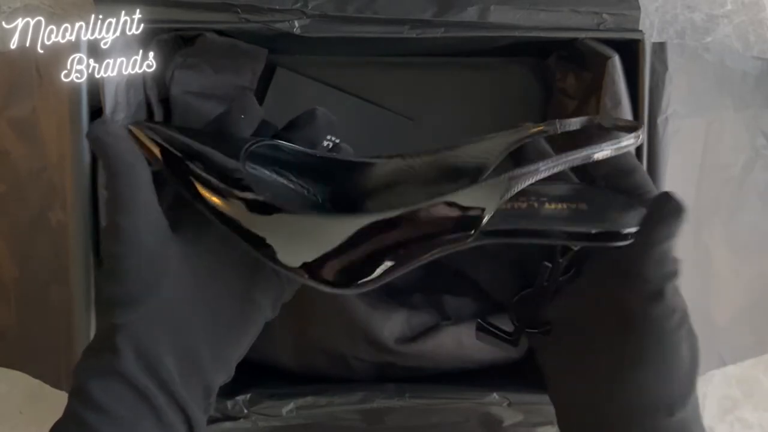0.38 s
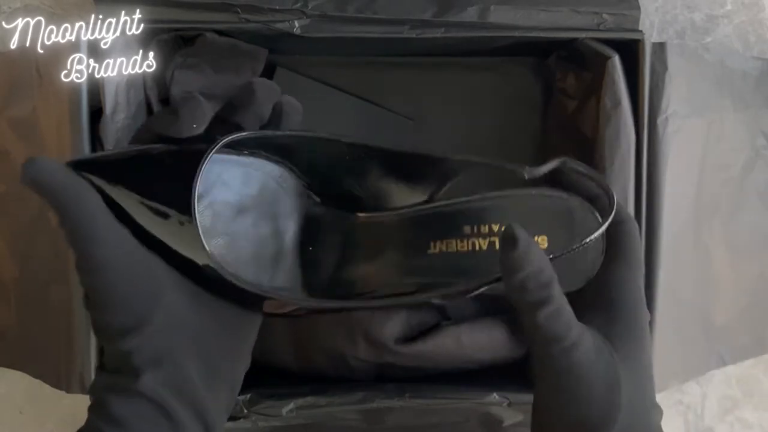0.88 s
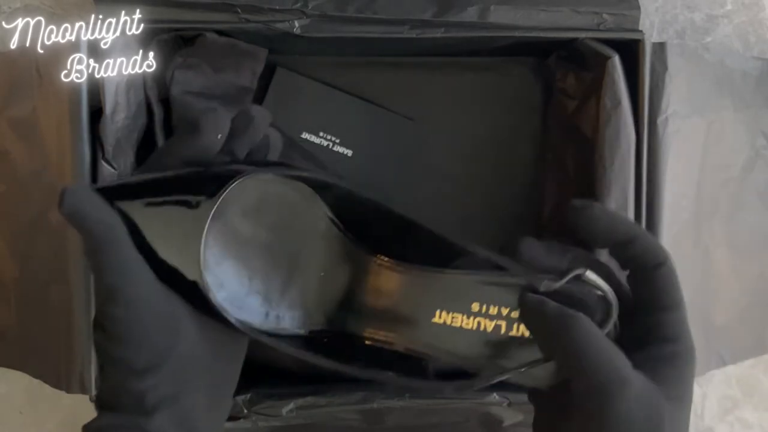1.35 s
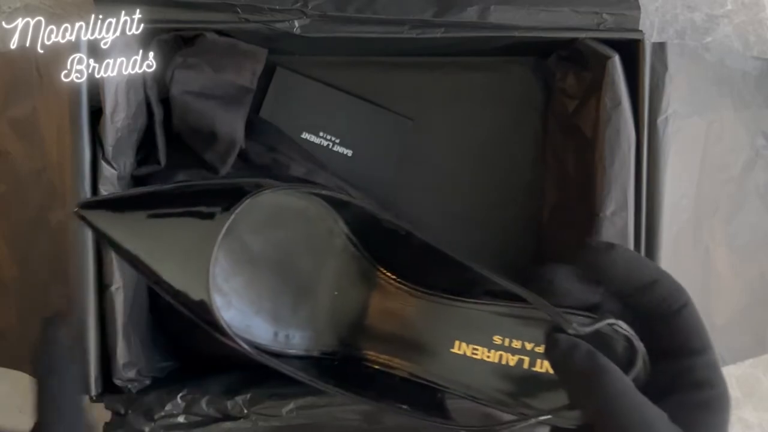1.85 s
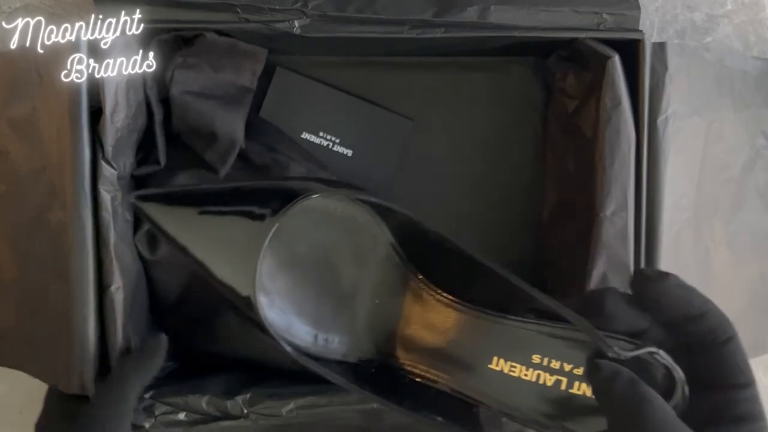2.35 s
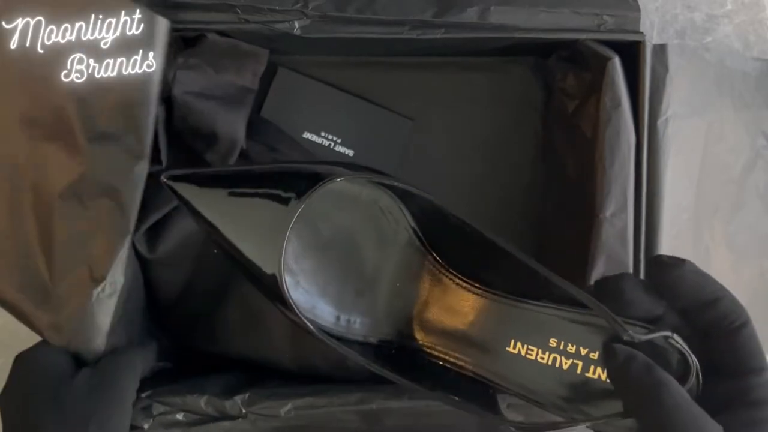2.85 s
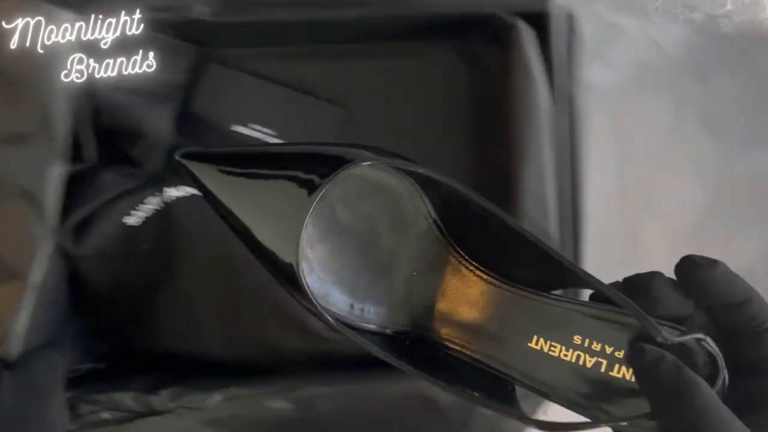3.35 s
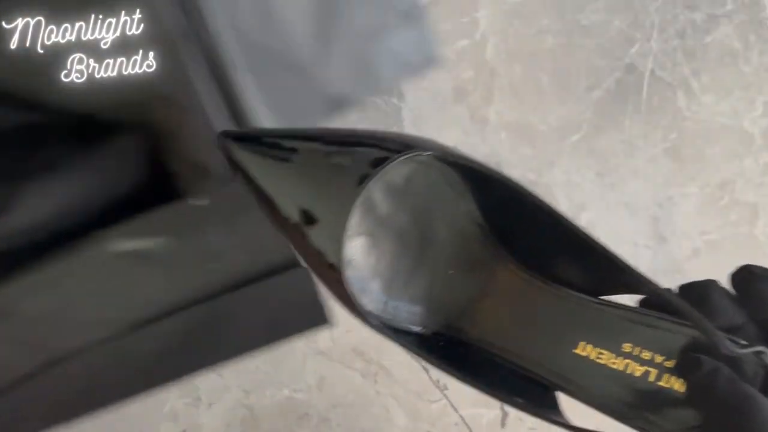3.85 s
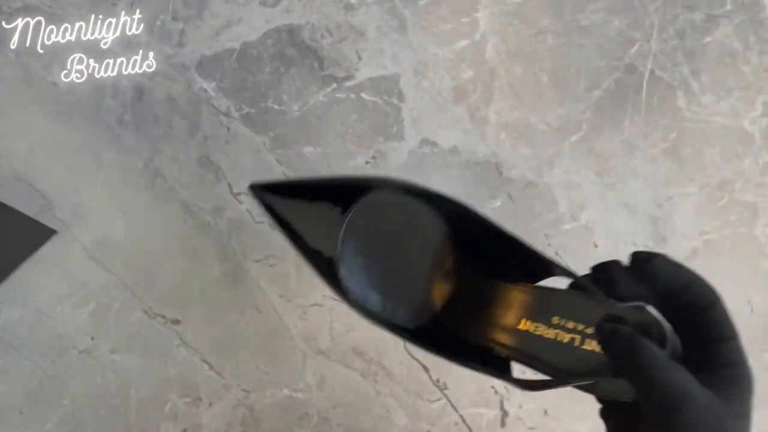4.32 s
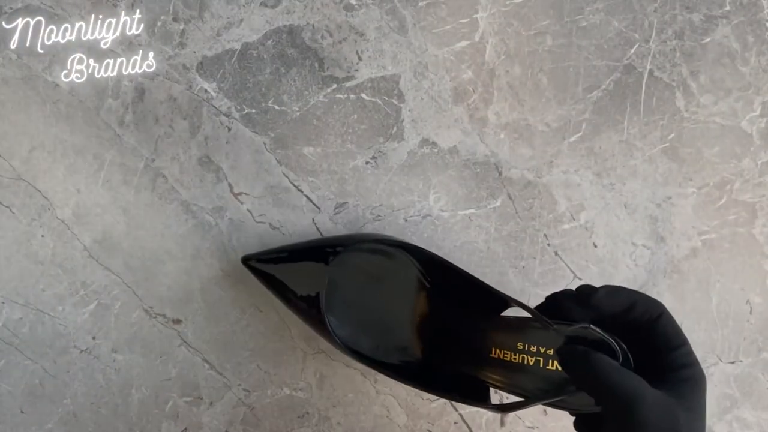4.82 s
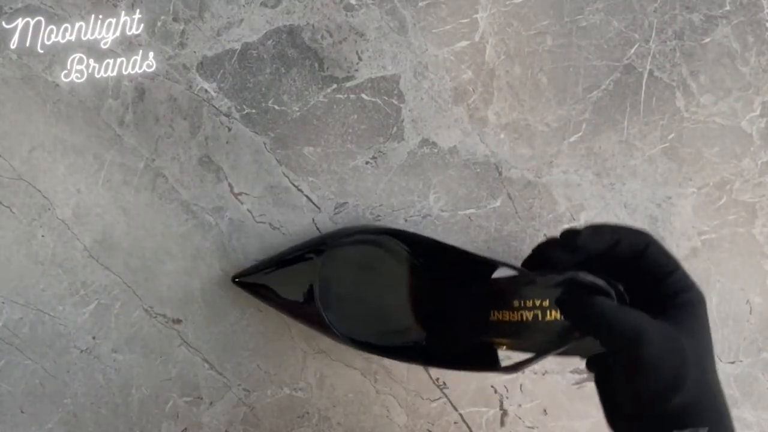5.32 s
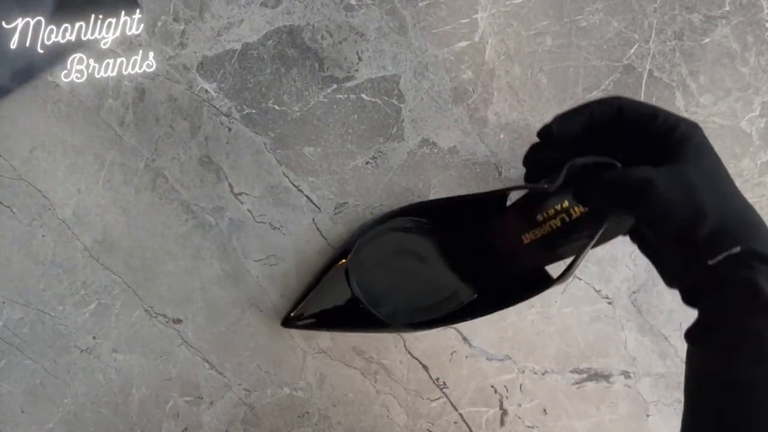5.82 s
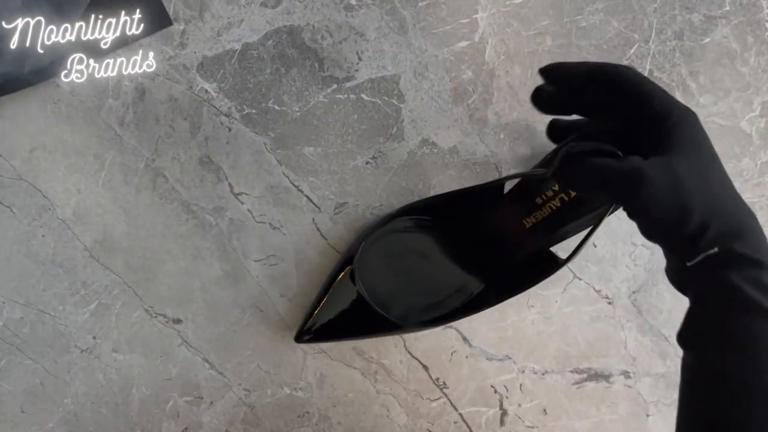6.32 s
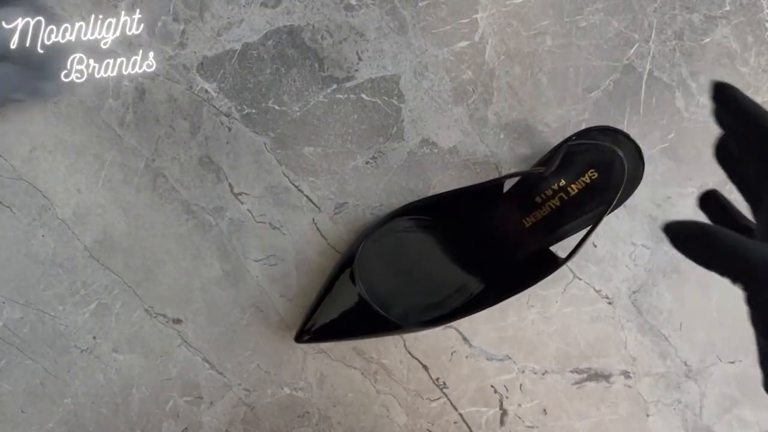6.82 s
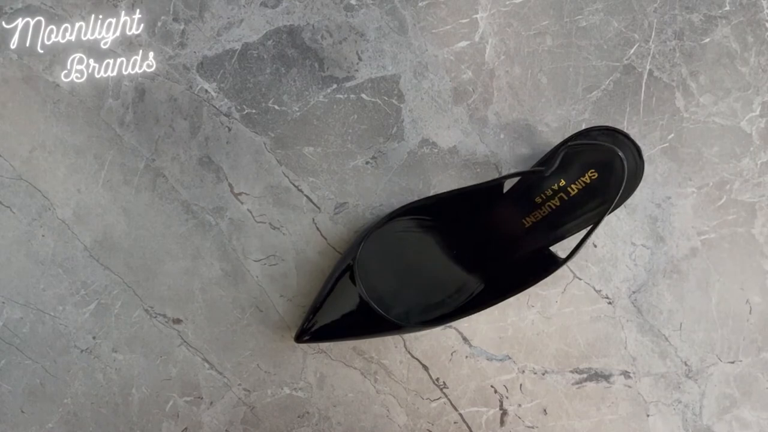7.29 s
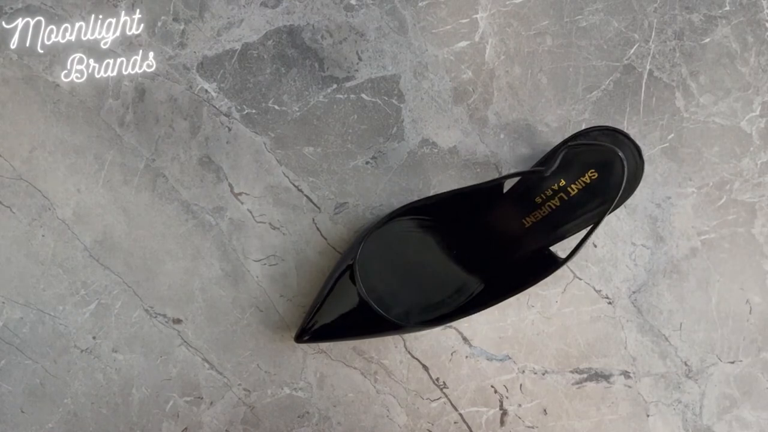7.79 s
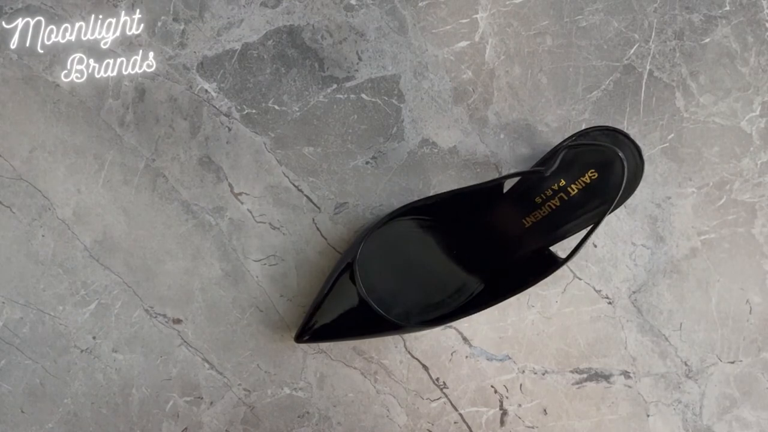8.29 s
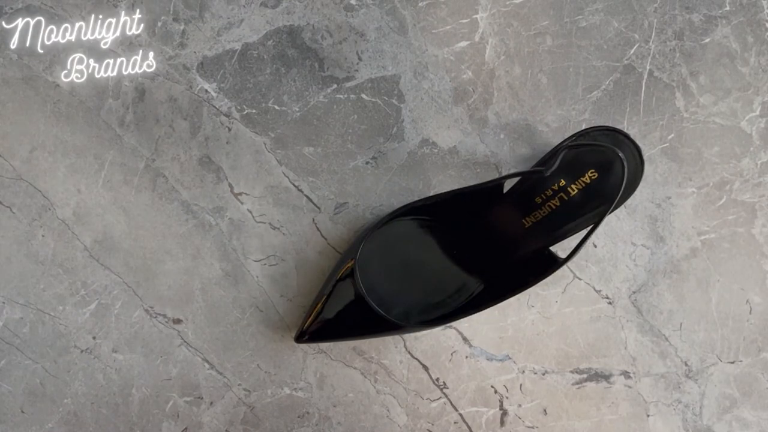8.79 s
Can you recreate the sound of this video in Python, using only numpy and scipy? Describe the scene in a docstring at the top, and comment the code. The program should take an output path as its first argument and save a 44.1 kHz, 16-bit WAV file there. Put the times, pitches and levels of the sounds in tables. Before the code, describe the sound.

Indoors, gloved hands handle a shoe almost silently over faint low room noise. Abruptly, crisp paper crinkles close by, with sharp individual creases. Stiff cardboard drags across a stone floor, ticking lightly at its edge, before one strong low thump and a quick hard heel click. Paper keeps rustling in irregular, quieter fits with short lulls, and a muffled box knock comes late. Close, dry stereo pickup.

```python
"""You hear soft glove strokes on a shoe, then busy tissue paper, a sliding box, thuds and taps, over low room noise.
Gloved hands turn the shoe over a cardboard box lined with tissue paper, drag the box aside over a stone floor
and go on handling the paper nearby. Gloves are smooth noise; paper is noise chopped into dense crackle, with
single loud creases on top; dragged cardboard adds a scrape and a hollow rumble. Box and heel ring when struck."""
import sys
import numpy as np
from scipy import signal
from scipy.fft import rfft, irfft
from scipy.io import wavfile
from scipy.ndimage import uniform_filter1d

SR = 44100
rng = np.random.default_rng(int(sys.argv[2]) if len(sys.argv) > 2 else 0)


def bounce(signal):
    """Save signal as a 16-bit WAV file at the path given by the first command-line argument."""
    frames = np.transpose(np.atleast_2d(signal))
    limited = np.clip(frames, -1, 1)
    pcm = np.round(limited * 32767).astype(np.int16)
    wavfile.write(sys.argv[1], SR, pcm)


def boost(x):
    """Linear amplitude factor 10**(x/20) for a level x in decibels (scalar or array-like)."""
    u = np.asarray(x, float) / 20
    return 10 ** u


N = 392931
T = np.arange(N) / SR  # time of every sample, s
HZ = np.arange(N // 2 + 1) * SR / N  # frequency of every spectrum line

# movements of the paper, with lulls between: start/s, length/s, rustle at start/dB, rustle at end/dB
PAPER_MOVES = [(2.014, .26, -52, -53.5), (2.348, 0.23, -54.5, -52.5), (2.595, 0.23, -46.5, -40.5),
               (2.884, 0.067, -39.5, -53), (2.976, 0.054, -57, -49.5), (3.08, 0.14, -59, -56),
               (3.186, 0.023, -55, -53.5), (3.221, 0.54, -45, -50), (3.846, .13, -59, -49.5),
               (3.988, 0.092, -46, -57), (4.145, 0.24, -54, -50), (4.428, 0.074, -54, -49.5),
               (4.518, 0.28, -46, -47.5), (4.834, 0.13, -58, -57), (4.934, 0.19, -52.5, -51.5),
               (5.122, 0.19, -45.5, -48), (5.341, 0.076, -46.5, -45), (5.456, 0.36, -64, -56),
               (5.804, 0.47, -50.5, -56.5), (6.121, 0.12, -51, -48.5), (6.278, 0.15, -58, -57),
               (6.545, 0.21, -58, -51.5), (6.803, 0.28, -53, -54.5), (7.23, 0.23, -68.5, -59.5),
               (7.598, 0.05, -58, -69), (7.67, 0.12, -65, -70), (7.823, .14, -62.5, -51),
               (7.966, .15, -63, -52.5), (8.137, 0.21, -50, -57.5), (8.437, 0.054, -53.5, -64.5),
               (8.596, 0.15, -54.5, -62), (8.851, 0.13, -59, -64)]
# tone colour of tissue paper: f/Hz, level/dB
TISSUE_COLOUR = [(500, -9), (900, 1), (1400, -1.5), (2300, 3), (3500, 2.67), (5500, 2.5), (8000, 4),
                 (10300, -1.5), (12200, 5.5), (15000, -1.5), (16000, -2)]
# tone colour of what differs between left and right: f/Hz, level/dB
SIDE_COLOUR = [(60, -64), (200, -20), (400, -9.5), (730, -5), (1200, -6.5), (1700, -25), (2500, -32),
               (4500, -20), (8000, -14.5), (11500, -12.5), (13200, -28)]


def unit(x):
    """Scale to an rms (average strength) of 1."""
    return x / np.sqrt(np.mean(x ** 2))


def colour(x, points):
    """Filter by a spectrum given as (Hz, dB) points."""
    hz, db = np.transpose(points)
    gain_db = np.interp(np.log(HZ + 1), np.log(hz), db)
    return irfft(rfft(x) * boost(gain_db), N)


def curves(table):
    """Draw each column of a table as a curve over all samples; the first column is time."""
    s, *columns = np.transpose(table)
    return [np.interp(T, s, c) for c in columns]


def noise():
    """Plain white noise as long as the scene."""
    return rng.standard_normal(N)


def walk(rate):
    """Smooth random wandering with an rms of 1; a higher rate wanders faster."""
    k = int(SR / rate)
    return unit(uniform_filter1d(uniform_filter1d(noise(), k), k))


def band(x, lo_hz, hi_hz):
    """Keep only the band between two frequencies."""
    return signal.sosfilt(signal.butter(2, [lo_hz, hi_hz], "bandpass", fs=SR, output="sos"), x)


def crackle(rate, scatter_db, length_ms):
    """Noise chopped into short bursts at random moments (rate per s); a few are much louder than the rest."""
    size = boost(scatter_db * np.minimum(rng.exponential(size=N), 4))
    starts = (rng.random(N) < rate / SR) * size
    fall = np.exp(-1000 / (length_ms * SR))
    # a quick filter rounds the start, a slow one makes the decay
    rounded = signal.lfilter([1], [1, -fall ** 5], starts)
    swell = signal.lfilter([1], [1, -fall], rounded)
    return unit(swell * noise())


def knocks(blows, modes, swell_ms):
    """A half-sine push of the contact time rings the modes of the struck body, which take a moment to build up."""
    push = np.zeros(N)
    for s, db, contact_ms in blows:
        k = max(int(contact_ms * SR / 1000), 4)
        start = int(s * SR)
        push[start:start + k] += boost(db) * np.sin(np.pi * np.arange(k) / k) / k
    t = T[:SR // 2]
    ring = np.zeros(len(t))
    for k, (hz, db, t60) in enumerate(modes):
        sign = (-1) ** k  # neighbouring modes start in opposite directions
        ring += sign * boost(db) * np.sin(2 * np.pi * hz * t) * 1000. ** (-t / t60)
    build_up = (1 - np.exp(-1000 * t / swell_ms)) ** 2
    return signal.fftconvolve(push, ring * build_up)[:N]


def room_air():
    """Quiet room noise, strongest in the bass: a slowly wavering middle and a separate side part."""
    # tone colour of the room noise: f/Hz, level/dB
    air_colour = [(25, -15.5), (60, -2.5), (100, 4), (160, -12), (300, -20.5), (500, -32.5), (900, -42),
                  (1600, -39), (2600, -47), (5000, -53), (10000, -53.5), (12300, -40), (15500, -38)]
    air_db = -56.5
    mid = boost(air_db + 1.5 * walk(4)) * unit(colour(noise(), air_colour))
    side = boost(air_db + 10.0) * colour(unit(colour(noise(), air_colour)), SIDE_COLOUR)
    return mid, side


def room_tail():
    """Short dense echoes from floor and walls, as fading noise."""
    t = T[:SR // 3]
    t60_s = 0.081  # time to fade by 60 dB
    tail = rng.standard_normal(len(t)) * 1000. ** (-t / t60_s) * (t > .002)
    return tail / np.sqrt(np.sum(tail ** 2))


def glove():
    """Smooth fabric noise: a hump from the shoe's hollow, a broad hiss, a thin fizz and a soft rumble."""
    # strokes on the shoe: start/s, length/s, hump/dB, broad hiss/dB, top fizz/dB, low rumble of the hands/dB
    strokes = [(0.393, 0.035, -82, -100, -90, -86), (0.504, 0.26, -83, -79.5, -70.5, -62.5),
               (0.753, 0.13, -84, -103, -81, -67), (0.896, 0.018, -74, -98, -90, -84),
               (1.219, 0.12, -65.5, -77.5, -63, -71), (1.792, .16, -112, -93.5, -68, -95)]
    # level between strokes, one per band: hump/dB, hiss/dB, fizz/dB, rumble/dB
    idle_db = [-99, -100, -119, -79.5]
    bands = [(1170, 1930), (2500, 4900), (11300, 21000), (111, 220)]  # (low Hz, high Hz)
    edge_s = 0.059  # longest fade at either end of a stroke
    gain = boost(np.array(idle_db))[:, None] * np.ones(N)
    for s, length, *db in strokes:
        inside_s = np.minimum(T - s, s + length - T)
        stroke = np.clip(inside_s / min(edge_s, length) + .5, 0, 1) ** 2
        gain = gain + boost(np.array(db))[:, None] * stroke
    fabric = sum(g * unit(band(noise(), *b)) for g, b in zip(gain, bands))
    return (T < PAPER_MOVES[0][0]) * fabric  # stops where the paper starts


def heel_taps():
    """The heel taps the stone: very short contacts ring its small, quickly fading modes."""
    # taps: t/s, strength/dB, contact/ms
    taps = [(5.5838, -19.5, 0.31), (5.6005, -35, .5), (5.6222, -29, 0.91)]
    # modes of the heel: f/Hz, level/dB, 60 dB decay/s
    heel_modes = [(336, -1, 0.028), (599, 11, 0.02), (691, -7, 0.07), (960, 0.5, 0.021), (1190, 0.5, 0.017),
                  (1680, -3, 0.016), (2200, 0, .01), (2800, -2, .01)]
    return knocks(taps, heel_modes, swell_ms=1.35)


def corner_taps():
    """The stiff edge of the box is tapped and rings for a moment."""
    # taps: t/s, strength/dB, contact/ms
    taps = [(3.516, -28, 0.22), (4.488, -20, 0.61)]
    # modes of the stiff edge: f/Hz, level/dB, 60 dB decay/s
    edge_modes = [(460, -5, 0.016), (820, 4, 0.011), (1480, -5, .015)]
    return knocks(taps, edge_modes, swell_ms=0.73)


def box_thuds():
    """Blows ring the low modes of the cardboard box."""
    # thuds: t/s, strength/dB, contact/ms
    thuds = [(5.383, -17.5, 3.8), (5.404, -30, 4.5), (5.452, -28, 5.5), (7.919, -37.5, 0.59),
             (7.927, -25, 2.14), (7.962, -39, 2.5), (7.984, -44, 1.6)]
    # modes of the box: f/Hz, level/dB, 60 dB decay/s
    box_modes = [(99, -10, 0.14), (182, 6.5, 0.057), (317, 2, 0.058), (520, 5, 0.072), (800, -12, 0.022)]
    return knocks(thuds, box_modes, swell_ms=1.85)


def creases():
    """Each crease lets go in a short burst: broad noise, a hump set by the size of the fold and a fine tick."""
    # the loudest creases: t/s, strength before the tissue colour/dB, hump f/Hz, fall/ms, fine tick/dB
    loudest = [(2.0288, -39, 7280, 3.3, -7), (2.0786, -22, 2410, 4.6, -7.5), (2.1036, -28, 4790, 2.4, -6),
               (2.1251, -29, 6400, 4.2, -8), (2.1635, -45, 6220, 2.8, -7), (2.1843, -37, 4490, 1.7, -7),
               (2.2001, -26, 3500, 2, -7), (2.2111, -28.5, 8300, 8.4, -5), (2.2335, -24.5, 4300, 2.6, -6),
               (2.4299, -37.5, 2550, 5.2, -8), (2.4436, -32, 2400, 4.1, -10), (2.4647, -31, 2510, 2.1, -9),
               (2.4856, -28.5, 3500, 2.6, -8), (2.5, -24, 2300, 2.8, -8), (2.5307, -25.5, 5800, 3.1, -7),
               (2.545, -37, 2430, 2.8, -5), (2.646, -20, 4600, 4, -6), (2.6772, -25, 5900, 2, -7),
               (2.6968, -25, 6720, 2.8, -8), (2.705, -25.5, 4060, 3.5, -7), (2.794, -27, 2040, 2.8, -7),
               (2.802, -24, 2710, 3, -4), (2.846, -21.5, 6800, 1.8, -9), (2.8544, -30, 8120, 1.7, -5),
               (2.8652, -31, 7490, 1.2, -4), (2.8849, -20.5, 2060, 2.8, -10),
               (2.9162, -15.5, 2320, 2.64, -7), (2.9386, -35, 2380, 2.8, -5), (2.9864, -26, 3380, 2.4, -7),
               (2.9938, -30, 2130, 3.3, -7), (3.0044, -33, 3390, 2, -9), (3.0109, -30, 3300, 2.1, -12),
               (3.0286, -24, 1810, 2.2, -9), (3.0396, -31.5, 3450, 4, -9), (3.4675, -27.5, 3360, 2.1, -6),
               (3.5139, -23.5, 4500, 3.3, -9), (3.6602, -24, 7760, 1.8, -5), (3.7449, -26.5, 3260, 2.6, -5),
               (4.155, -35, 6170, 3.3, -7), (4.218, -29, 6180, 2.8, -5), (4.4303, -28.5, 2060, 3.4, -10),
               (4.451, -26, 6840, 1.6, -8), (4.5406, -18.5, 2680, 1.25, -9), (4.6581, -27, 6230, 3.5, -7),
               (4.7876, -41, 6770, 2.8, -5), (4.8132, -27.5, 3180, 2.1, -8), (4.9196, -31.5, 3030, 3.1, -6),
               (5.074, -35, 7400, 3.1, -7), (5.0906, -29, 6020, 2.8, -3), (5.255, -33, 4340, 3.4, -7),
               (5.3102, -25.5, 2920, 2.2, -11), (5.508, -36, 2600, 1.9, -9), (5.7526, -33, 7660, 1.4, -5),
               (5.8256, -38, 2600, 2.4, -7), (5.9222, -36, 7490, 3, -10), (6.036, -29.5, 8100, 1.9, -7),
               (6.0775, -30.5, 2600, 2.4, -8), (6.167, -28.5, 2680, 4.3, -8), (6.2222, -28, 1690, 2.6, -6),
               (6.3532, -35, 5800, 1.9, -7), (6.419, -34, 5640, 1.9, -10), (6.4743, -38, 6390, 2.5, -8),
               (6.543, -33, 2770, 2.1, -6), (6.6647, -33, 7800, 2.3, -7), (6.7265, -31, 6230, 2.8, -5),
               (6.7976, -34, 2990, 4.1, -4), (6.8748, -34.5, 3380, 2.3, -5), (6.8917, -31, 3450, 1.8, -10),
               (6.92, -30, 2170, 2, -6), (6.9383, -29, 8480, 4.2, -9), (7.1008, -35.5, 2790, 2.5, -11),
               (7.237, -39.5, 7100, 2.3, -6), (7.3272, -32, 2010, 2.5, -12), (7.426, -49, 3680, 2.4, -4),
               (7.6929, -39.5, 6000, 4, -6), (7.7543, -40, 2390, 2.8, -6), (7.8216, -38, 6960, 5.3, -5),
               (7.889, -29.5, 2790, 2.1, -7), (7.9152, -28, 7560, 3.2, -8), (8.296, -37, 8700, 2.4, -7),
               (8.305, -33, 6250, 2.8, -4), (8.333, -32, 7600, 2.1, -5), (8.6043, -38, 8080, 2.8, -5),
               (8.837, -41, 6600, 2.4, -6.5)]
    size = 2048  # samples per burst
    out = np.zeros(N + size)
    ms = np.arange(size) * 1000 / SR
    for s, db, hz, fall, tick_db in loudest:
        broad = rng.standard_normal(size)
        hump = band(broad, hz / 1.32, min(hz * 1.34, 18000))
        tick = band(broad, 10500, 20500)
        burst = unit(.5 * broad + 0.37 * hump + boost(tick_db) * tick)
        rise = max(0.83 * fall, .1)
        after_rise = np.maximum(ms - rise, 0)
        shape = np.minimum(ms / rise, 1) ** 2 * np.exp(-after_rise / max(fall, .2))
        start = int(s * SR)
        out[start:start + size] += boost(db) / np.sqrt(2) * shape * burst
    return colour(out[:N], TISSUE_COLOUR)


def effort():
    """Level of the rustle in dB: each movement sets in fast, drifts from its first to last level and dies away."""
    attack_s, release_s, lull_db = 0.018, 0.04, -67.5
    power = boost(2 * lull_db) + np.zeros(N)
    for s, length, first_db, last_db in PAPER_MOVES:
        attack = np.clip((T - s) / attack_s, 0, 1)
        release = np.exp(-np.maximum(T - s - length, 0) / release_s)
        level = boost(np.interp(T, [s, s + length], [first_db, last_db]))
        power += (attack * release * level) ** 2
    return 10 * np.log10(power)


def paper():
    """Countless small folds make the rustle; dragged and shaken cardboard adds a scrape and a hollow rumble."""
    # balance at middling effort: t/s, cardboard scrape/dB, hollow rumble/dB, treble of finest folds against rustle/dB
    balance = [(2.0, -64, -65, 4), (2.4, -58, -68.5, 2.5), (2.8, -56.5, -65.5, 3.5), (3.12, -55, -70, -2.5),
               (3.3, -57, -60.5, 0), (3.7, -64, -73, 6), (3.95, -54, -57, 5), (4.15, -64.5, -66, 8.5),
               (4.35, -64, -61.5, 4.5), (4.5, -45, -56, 5.5), (4.75, -55.5, -58, 4.5),
               (5.25, -56.5, -65, 4.5), (5.6, -52, -48.5, 5), (5.85, -57, -68, 4), (6.2, -54.5, -60.5, 2.5),
               (6.55, -58, -64.5, 0.5), (6.92, -56.5, -62, 5.5), (7.2, -64.5, -64, 6),
               (7.85, -58.5, -61, 5), (7.97, -57, -49.5, 5), (8.2, -58.5, -59, 2.5), (8.6, -62, -61.5, 6.5),
               (8.91, -63.5, -59, 6)]
    # box sliding over stone: t/s, share of smooth sliding/0-1, resonance f/Hz, resonance against rustle/dB
    sliding = [(3.15, 0.3, 2210, -14), (3.25, 0.64, 2310, -30), (3.74, 0.96, 2500, -26),
               (3.8, 0.48, 2236, -29), (4.2, 0.3, 2045, -2.5), (4.38, 0.98, 2418, -1),
               (4.5, 0.9, 2500, -6.5), (4.7, .5, 2963, -1), (4.85, 0.4, 2930, -12), (5.4, 0.38, 2920, -30)]
    # tone colour of scraped cardboard: f/Hz, level/dB
    cardboard_colour = [(150, -34), (330, -6.5), (550, 0.5), (800, -3.5), (1100, -8), (1500, -8),
                        (2500, -17.5)]
    middling_db = -55
    scrape_follows, hollow_follows, treble_follows = 0.68, 0.73, 0.06  # dB per dB of rustle
    rustle_db = effort()
    effort_db = rustle_db - middling_db
    scrape_db, hollow_db, top_db = curves(balance)
    smooth, rub_hz, rub_db = curves(sliding)
    smooth = np.clip(smooth, 0, 1)

    # folds of different sizes let go at different moments, so low and high crackle partly apart
    small = band(crackle(700, 6.9, 0.57), 3200, 22000)
    large = band(crackle(400, 3.3, 1.74), 600, 3400)
    folds = crackle(160, 2.3, 2.9) + boost(-5.5) * (small + large) + boost(-11.5) * noise()
    folds = unit(folds) * boost(1.5 * walk(34))  # wavers by about 1.5 dB
    # smooth sliding swaps crackle for even noise
    folds = np.sqrt(1 - smooth) * folds + np.sqrt(smooth) * noise()
    folds = colour(folds, TISSUE_COLOUR)

    # split off the treble, mostly above 5 kHz, to set its level apart
    top = irfft(rfft(folds) / (1 + (5000 / (HZ + 1)) ** 8), N)
    body = (folds - top) / np.sqrt(np.mean(band(folds, 1100, 4660) ** 2))

    # the sliding resonance: a narrow band of noise around a moving pitch
    rub = unit(walk(800) * np.sin(2 * np.pi * np.cumsum(rub_hz) / SR))
    scrape = unit(colour(crackle(300, 4.5, 5.0) + noise(), cardboard_colour))
    scrape = scrape * boost(2 * walk(7))  # wavers by about 2 dB
    hollow = unit(band(band(noise(), 130, 430), 130, 430))

    treble_gain = boost(top_db + treble_follows * effort_db)
    tissue = boost(rustle_db) * (body + treble_gain * unit(top) + boost(rub_db) * rub)
    box = boost(scrape_db + scrape_follows * effort_db) * scrape
    box = box + boost(hollow_db + hollow_follows * effort_db) * hollow
    return (T > PAPER_MOVES[0][0]) * (tissue + box)


def scene():
    """Close sources with a little room; filtered echoes, air and a little direct sound set the sides apart."""
    air_mid, air_side = room_air()
    near = glove() + heel_taps() + corner_taps() + box_thuds() + creases() + paper()
    mid_echo = signal.fftconvolve(near, room_tail())[:N]
    side_echo = signal.fftconvolve(near, room_tail())[:N]
    mid = near + boost(-13.5) * mid_echo + air_mid
    side = colour(boost(-2) * side_echo + 0.14 * near, SIDE_COLOUR) + air_side
    return np.array([mid + side, mid - side])


def low_pass(x):
    """Removes everything above the highest recorded frequency."""
    return signal.sosfilt(signal.butter(12, 16990, fs=SR, output="sos"), x)


def record(dry):
    """The two microphone ports turn the treble's phase against each other; the top is cut."""
    # phase between the ports: f/Hz, left leads by/radians
    port_phase = [(0, 0), (4130, -.1), (4570, -.4), (4820, -1.2), (5050, -3.14), (5250, -5.3), (5680, -6.1),
                  (7800, -6.5), (8440, -6.9), (12200, -9.0), (13000, -9.36), (15000, -9.5), (16500, -9.8)]
    top_hz = 15750
    hz, turn = np.transpose(port_phase)
    half = np.interp(HZ, hz, turn) / 2  # each side takes half the turn
    x = irfft(rfft(dry) * np.exp(1j * np.array([half, -half])), N)
    x = signal.sosfilt(signal.ellip(12, .2, 70, top_hz, fs=SR, output="sos"), x)
    return low_pass(x)


dry = scene()
out = record(dry)
bounce(out)
```